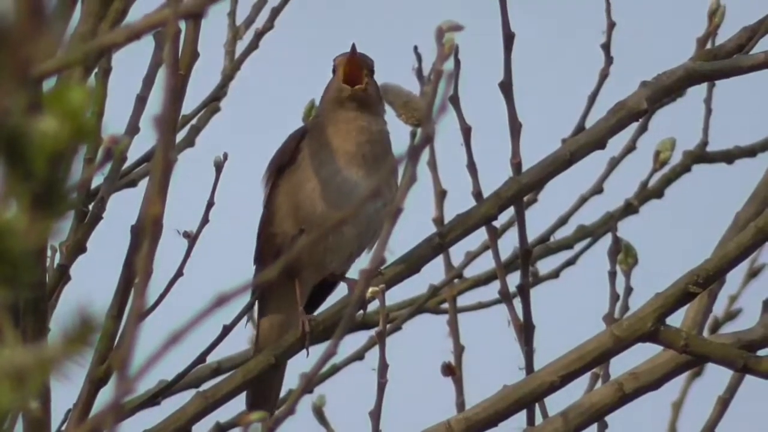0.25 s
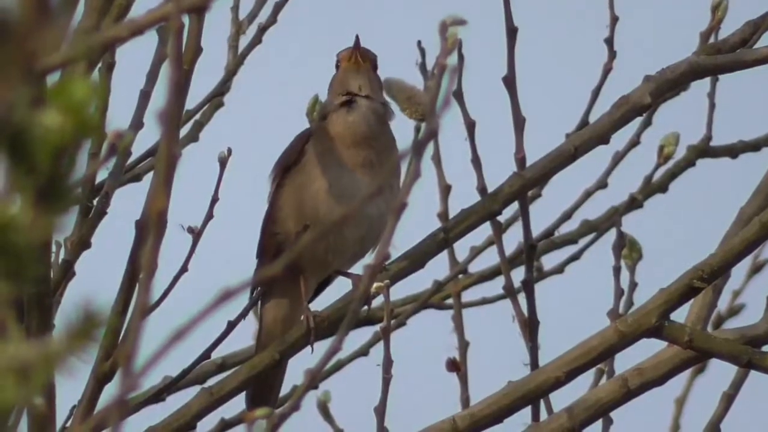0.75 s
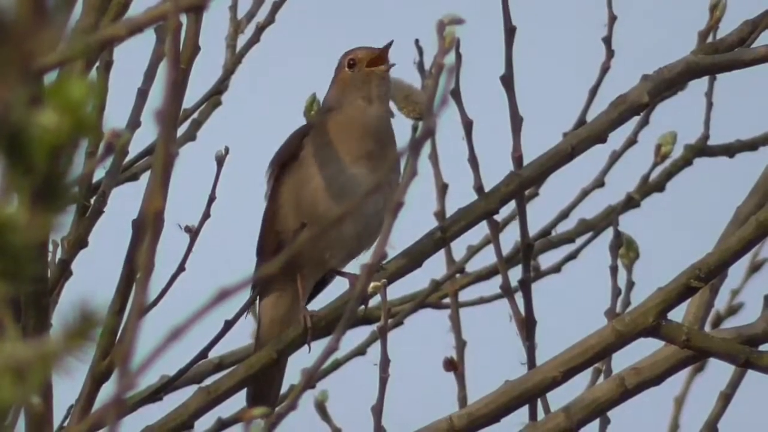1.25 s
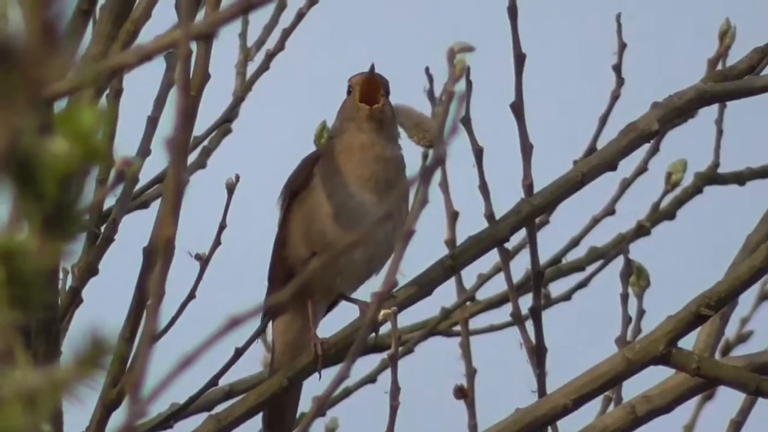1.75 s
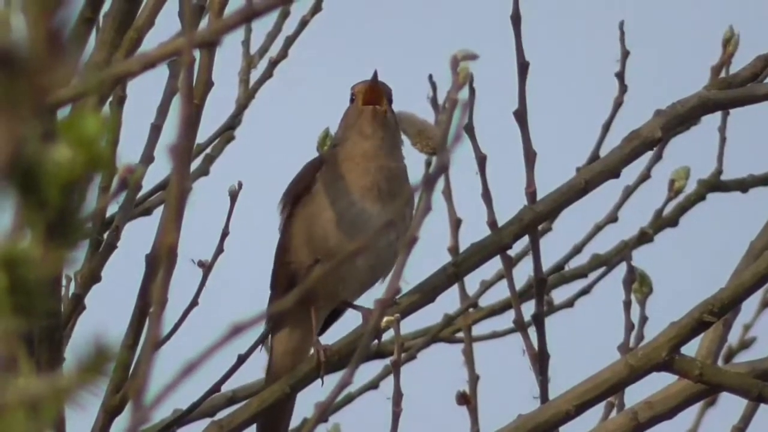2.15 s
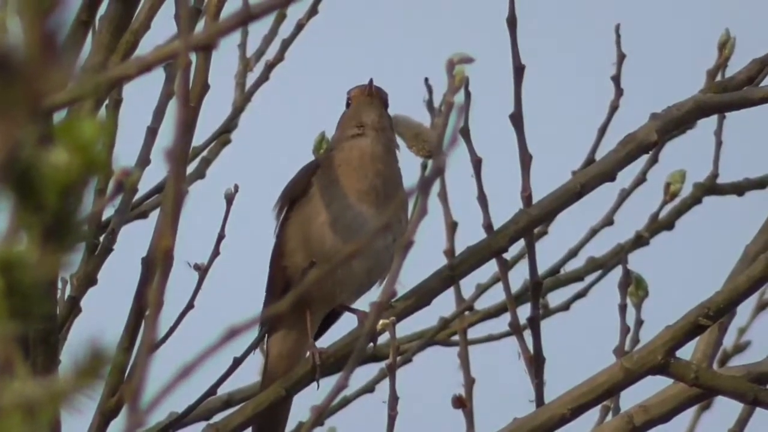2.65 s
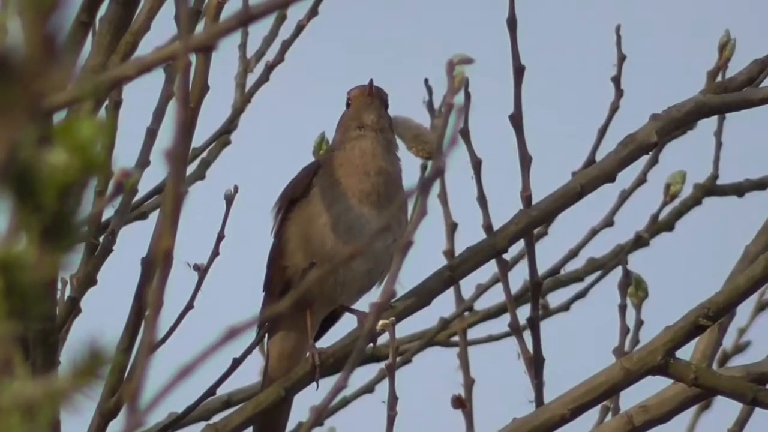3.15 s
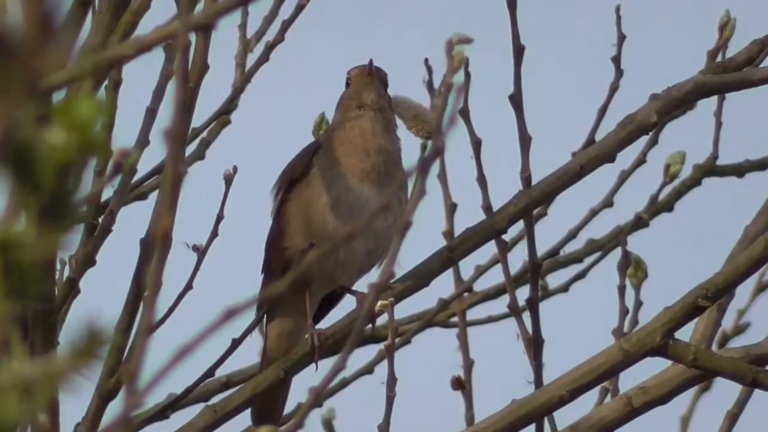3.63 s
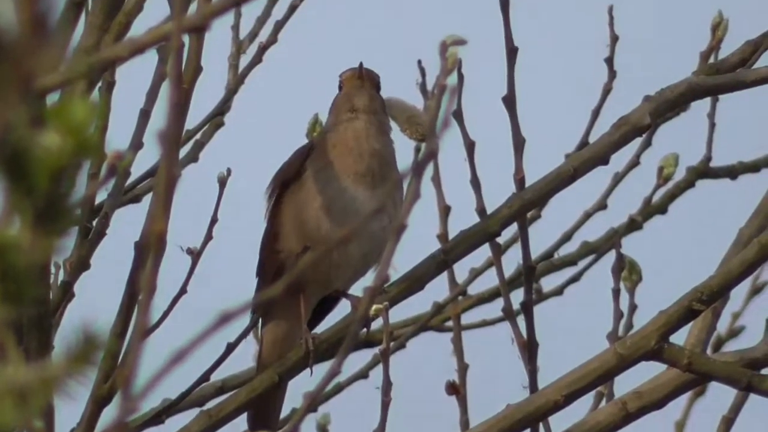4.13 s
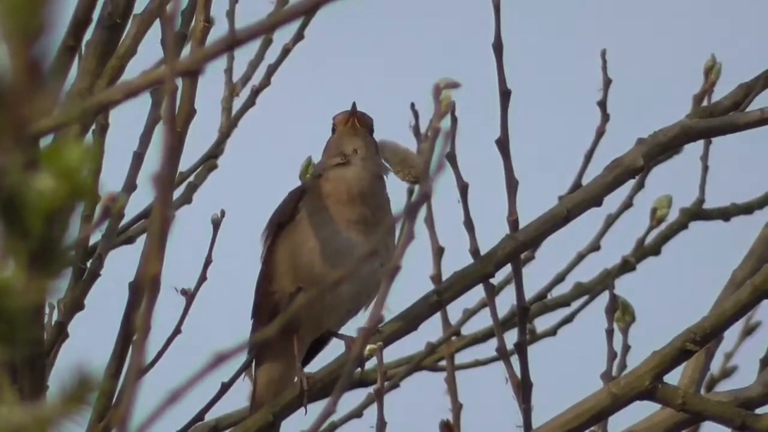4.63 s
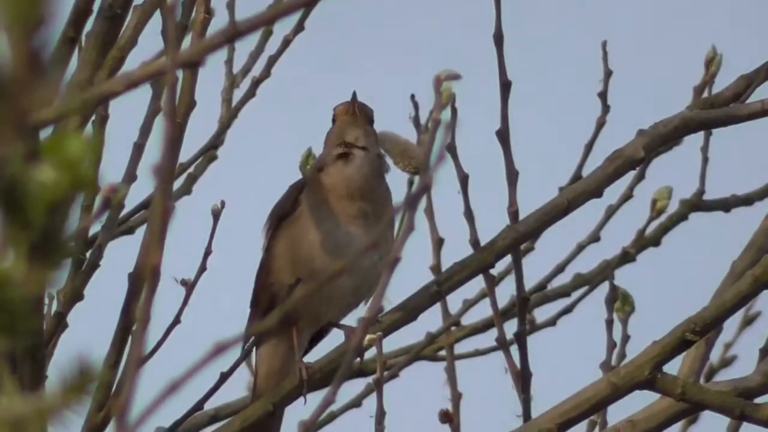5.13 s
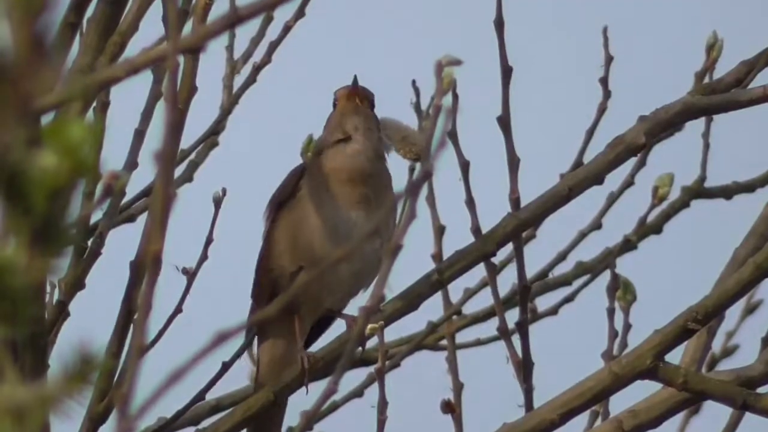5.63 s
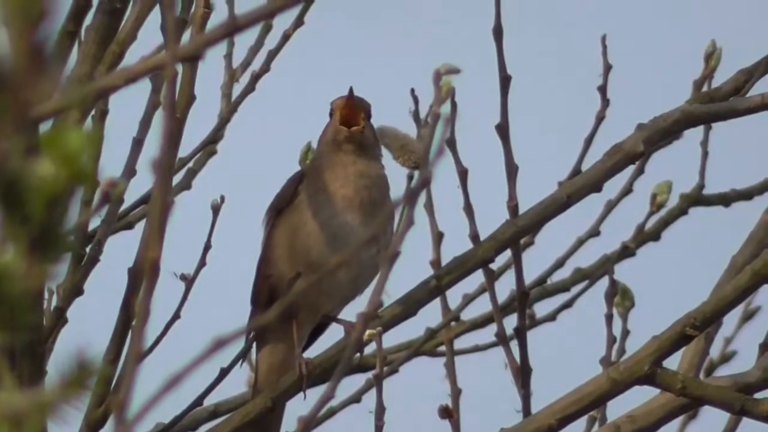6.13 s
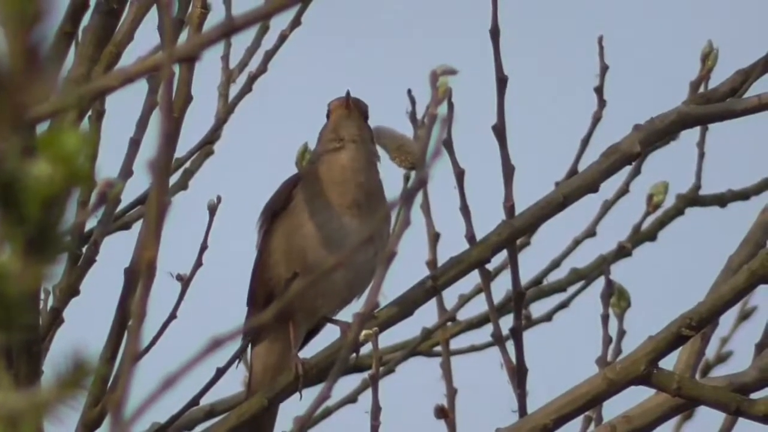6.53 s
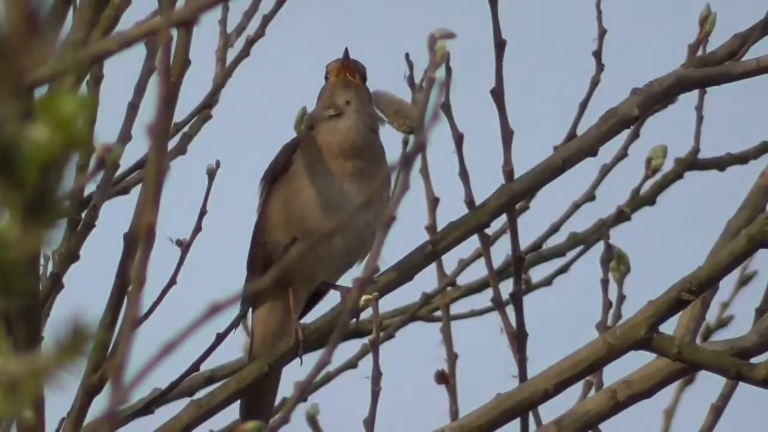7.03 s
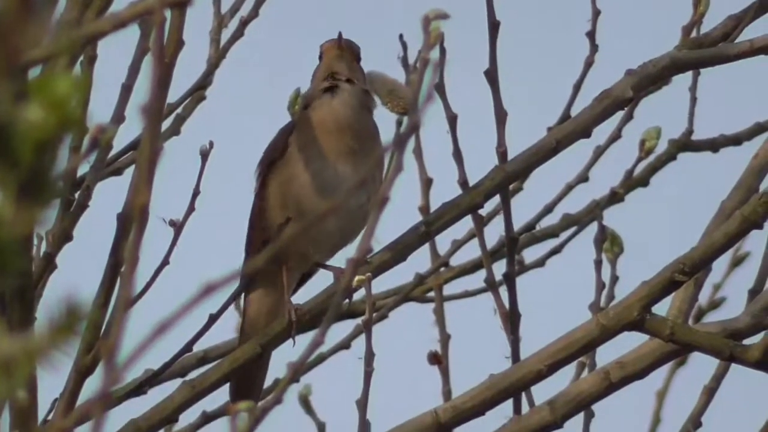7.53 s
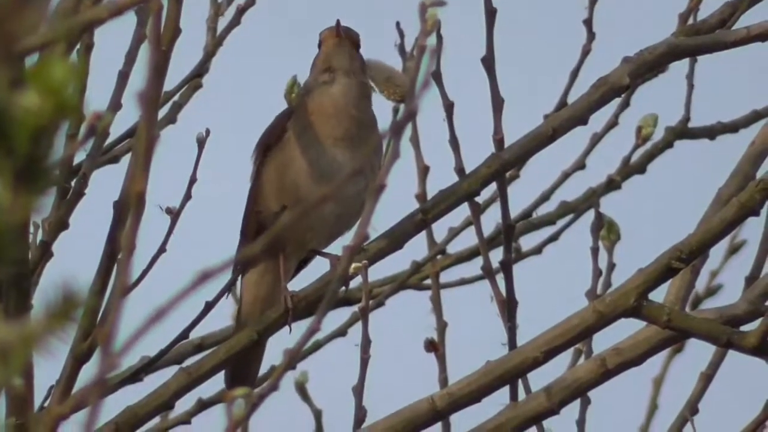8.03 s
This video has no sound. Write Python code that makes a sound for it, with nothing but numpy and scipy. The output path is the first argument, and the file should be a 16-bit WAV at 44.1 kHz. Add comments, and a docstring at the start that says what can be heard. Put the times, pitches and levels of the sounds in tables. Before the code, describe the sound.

A nightingale sings close by in varied bursts of whistles, clicks, trills and a buzz, with fainter birds and a high steady reel behind.

```python
"""A nightingale sings close by: whistles, sweeps, a trill, a rattle of clicks and a buzz.
Its whistles are near-pure tones with beak-coloured overtones; clicks are very fast pitch drops with a rasp.
Other birds answer from the thicket with fainter whistles, one with a steady reel of pulses near 4 kHz.
Shaped noise makes the low wash of a distant road, and the trees throw every note back as a fading tail."""
import sys
import numpy as np
from scipy import signal
from scipy.fft import rfft, irfft
from scipy.io import wavfile
from scipy.ndimage import uniform_filter1d

SR = 44100
rng = np.random.default_rng(int(sys.argv[2]) if len(sys.argv) > 2 else 0)


def wav_record(signal):
    """Record a signal, one row per channel, as 16-bit PCM in the file named by sys.argv[1]."""
    frames = np.transpose(np.atleast_2d(signal))
    bounded = np.clip(frames, -1, 1)
    # unit amplitude maps onto the largest positive 16-bit level
    quanta = np.round(bounded * 32767).astype(np.int16)
    wavfile.write(sys.argv[1], SR, quanta)


N = 364707  # length of the scene in samples

# Single notes. Each entry: beak opening as dB on the high overtones, then rows of
# time in seconds, pitch in Hz, level in dB.
NOTES = [(-5, [(1.075, 3040, -40), (1.078, 3140, -31.5), (1.088, 2275, -23.5), (1.096, 1770, -34.5),
         (1.104, 1356, -34.5), (1.122, 1230, -41.5)]), (20, [(2.691, 5700, -41), (2.695, 4460, -29.5),
         (2.71, 1160, -51)]), (13.5, [(6.42, 6830, -43), (6.425, 3800, -24.5), (6.432, 3077, -35),
         (6.441, 3615, -25), (6.455, 3930, -23.5), (6.499, 4103, -24), (6.51, 4000, -29)]),
         (-22, [(6.797, 1430, -58), (6.806, 1174, -42), (6.87, 1125, -44.5), (6.885, 1170, -73)])]

# Syllables sung over and over. Each event row: start in seconds, level in dB.
# Each shape row: seconds after the start, pitch in Hz, dB added to the event's level.
# Long falling sweeps.
SWEEPS = [(1.386, -23.5), (1.696, -24)]
SWEEP_SHAPE = [(0.0, 3000, -7), (0.004, 2914, -0.5), (0.026, 1544, -11), (0.029, 1340, -11),
               (0.054, 1221, -19.5)]
# Short drops before the rising whistles.
DROPS = [(6.93, -28.5), (7.127, -28.5), (7.417, -27), (7.721, -27.5), (8.009, -29)]
DROP_SHAPE = [(0, 3070, -23), (0.003, 2176, 0), (0.013, 1550, -11), (0.019, 1240, -10)]
# Low tucks between the rising whistles.
TUCKS = [(7.228, -46), (7.305, -43.5), (7.5276, -43), (7.6054, -43.5), (7.8265, -45), (7.9036, -41.5)]
TUCK_SHAPE = [(-.003, 1650, -4), (.001, 1267, 2.5), (0.008, 1000, -1)]
# Fairly level low whistles after the sweeps.
HOOTS = [(1.157, -42), (1.23, -43.5), (1.472, -44.5), (1.558, -43.5)]
HOOT_SHAPE = [(0, 1057, -6), (0.01, 1111, 1.5), (.038, 1190, 4), (.05, 1140, -41)]
# One syllable of the trill (its times are worked out in trill_events).
TRILL_SHAPE = [(-.003, 2110, -24), (.002, 2009, 2.5), (.005, 1953, -1.5), (0.01, 1885, -4.5),
               (0.017, 1750, -26)]
# A low dipping whistle from the right.
DIPS = [(3.519, -58), (3.969, -57.5), (4.463, -54), (4.983, -56)]
DIP_SHAPE = [(0, 2054, -2), (.008, 1397, 3.5), (0.022, 1245, -8), (0.047, 1992, 8), (.08, 1940, 3),
             (0.119, 1640, -1)]
# Thin rising calls of a far bird.
RISES = [(7.385, -61.5), (7.578, -62.5), (7.755, -59), (7.884, -59), (8.029, -52.5), (8.164, -50)]
RISE_SHAPE = [(-.004, 5650, -10), (.01, 7620, -5.5), (0.026, 8300, -4)]
# Faint falling chirps from deep in the thicket.
FALLS = [(4.54, -57), (4.8, -56), (4.905, -57.5), (5.025, -60)]
FALL_SHAPE = [(0, 4000, -1), (.02, 3460, -4.5), (.055, 2950, -17)]

# Stretched syllables. Each event row: start in seconds, length in seconds, low pitch in Hz,
# high pitch in Hz, level in dB.
# Each shape row: share of the length, height from low (0) to high (1), dB added to the event's level.
# Rising whistles after the drops.
LIFTS = [(7.156, 0.044, 1213, 2547, -27.5), (7.446, 0.046, 1140, 2560, -27.5),
         (7.751, 0.047, 1186, 2638, -27), (8.039, 0.05, 1080, 2910, -27)]
LIFT_SHAPE = [(0, 0, -19.5), (0.251, .35, -21.5), (.45, 0.73, -1.5), (.65, 0.98, -1), (.88, 1, -1.5),
              (1, 1, -10.5)]
# Paired scoops that sag, then flick up.
SCOOPS = [(3.93, 0.052, 3794, 4560, -30.5), (4.0, 0.048, 3733, 4360, -29.5), (4.315, .047, 3780, 4350, -25),
          (4.383, 0.047, 3605, 4190, -24.5)]
SCOOP_SHAPE = [(0, 0.45, -23), (.3, 0.008, -9), (.6, 0.19, 1), (.87, 1, -1.5), (1, 0.94, -22)]
# Low loops: a quick dip, a climb and a long sag.
LOOPS = [(5.181, 0.13, 1282, 1834, -37), (5.729, 0.12, 1140, 1836, -36.5)]
LOOP_SHAPE = [(0, 0.91, -64), (0.017, .85, -0.5), (0.069, 0.095, -4.5), (.15, 0.0098, -3),
              (0.289, 0.88, -2.5), (.4, 1, 2.5), (.92, .5, -4), (1, 0.53, -39)]
# Bright lead-ins to the later two seeps.
LEAD_INS = [(.316, 0.034, 6000, 7240, -37.5), (4.876, 0.027, 6330, 7050, -41)]
LEAD_IN_SHAPE = [(0, 0, -23), (.22, 0.92, -.5), (.55, 0.95, -19), (1, 1, -13)]
# Thin high seeps from the left.
SEEPS = [(0, 0.036, 7190, 7630, -37), (.343, 0.032, 7500, 7550, -23.5), (4.9, 0.034, 7510, 7950, -26.5)]
SEEP_SHAPE = [(0, 0.93, -3), (.2, 0.67, -10.5), (.5, 0.03, -7), (1, 0.13, -24.5)]

# Overtones against the first partial. Each row: the overtone's own frequency in Hz, level in dB.
OVERTONES = [(2000, -27), (3500, -22.5), (5200, -29.5), (6500, -29), (8000, -39.5), (10200, -18.5),
             (12500, -25.5), (13800, -27), (15600, -54)]
# Air whistling past the beak during the trill. Each row: time in seconds, pitch in Hz, level in dB.
TRILL_HISS = [(.59, 12700, -65), (.93, 12600, -69.5)]
# Single clicks near 4 kHz. Each row: start in seconds, level in dB.
CLICKS = [(1.057, -27), (1.369, -27), (1.6813, -28.5), (2.6873, -26.5), (5.5276, -36), (5.5354, -35.5)]
# Lower double ticks with the beak nearly shut. Each row: start in seconds, level in dB.
TICKS = [(0.1744, -30.5), (0.181, -39), (4.7095, -35), (4.7168, -42)]
# Click groups of the rattle. Each row: start in seconds, length in seconds, level in dB.
RATTLE = [(1.834, 0.082, -32), (1.974, 0.078, -31), (2.1193, 0.078, -31), (2.2583, 0.081, -30),
          (2.4, .0806, -30), (2.5424, 0.082, -31)]
# The four clicks of a group. Each row: share of the group's length, dB added to its level.
RATTLE_GROUP = [(0, -0.35), (.252, 0.87), (0.729, -1.2), (1, -0.72)]
# Colour of the air rasping in a click. Each row: frequency in Hz, relative level in dB.
RASP = [(1500, -27), (2500, -47), (4300, 3), (7000, -11), (10300, -1.5), (13500, -7), (15800, -71)]
# The buzz. Each row: time in seconds, level in dB, pitch in Hz, second partial against the first in dB.
BUZZ = [(6.041, -48, 6440, 1), (6.308, -54.5, 5800, 3), (6.325, -58, 6160, -3)]
# Colour of the air in the buzz. Each row: frequency in Hz, relative level in dB.
BUZZ_HISS = [(4800, -40), (5800, 1), (7600, -5), (10300, 4), (12300, -14), (13700, 1), (14600, -26)]
# Level difference of the near bird at the two microphone ports. Each row: frequency in Hz, left minus right in dB.
PORT_LEAN = [(1150, 1.3), (1900, 2), (3000, -.7), (4000, -1.3), (6200, 2.2), (12000, .3)]
# Phase difference there. Each row: frequency in Hz, lead of the left in radians.
PORT_PHASE = [(1150, -.1), (1900, -.22), (2900, -.18), (4000, .11), (6200, .72), (9000, -.5), (12000, 0)]

# Gliding calls of other birds. Each row: start in seconds, length in seconds, first pitch in Hz,
# last pitch in Hz, share of the length spent gliding, level in dB, left minus right in dB.
GLIDES = [(0.03, 0.038, 2900, 1440, 0.68, -68, 4), (0.032, 0.03, 8900, 8450, 0.68, -62.5, 6),
          (0.14, 0.036, 7460, 7680, 0.59, -61.5, 21), (0.355, 0.023, 7750, 7930, 0.54, -43.5, 9),
          (0.425, 0.045, 8000, 7500, 0.44, -57, 13), (0.355, 0.047, 3000, 1450, 0.69, -67, 1),
          (2.065, .11, 3210, 2930, 0.46, -59, 13), (2.63, 0.068, 3155, 3203, 0.74, -52.5, 13),
          (2.736, 0.078, 2480, 2355, 1, -69.5, 14), (2.885, 0.083, 4160, 3146, 0.16, -56, 12),
          (2.985, 0.1, 5100, 4860, 0.5, -64, -2), (3.108, 0.02, 9900, 10040, 0.66, -59, 3),
          (3.234, 0.022, 5150, 5000, 0.59, -50.5, 5), (3.317, 0.023, 3160, 5150, 0.33, -66.5, -6),
          (3.638, 0.083, 4540, 4390, 0.56, -70.5, -5), (3.784, 0.025, 4460, 5300, 0.92, -65, -3),
          (3.886, 0.035, 3620, 4180, 0.91, -61.5, -3), (4.203, 0.062, 3340, 4750, 0.99, -63, 0),
          (5.152, 0.047, 5650, 5200, 0.9, -76, 5), (5.165, .02, 3500, 3550, .5, -60, -3),
          (8.13, 0.14, 586, 553, 0.5, -56.5, -7)]
# Warbles of other birds. Each entry: left minus right in dB, flutters per second, time of a pitch crest
# in seconds, then rows of time in seconds, pitch in Hz, level in dB, flutter depth in Hz.
WARBLES = [(9.5, 46, 1.4, [(1.445, 3920, -57, 512), (1.5, 3870, -57.5, 498), (1.538, 4800, -58, 0),
           (1.572, 3140, -54, 0), (1.612, 3290, -58, 0)]), (9.0, 82.5, 5.5, [(3.0, 3525, -54, 0),
           (3.042, 3625, -43.5, 0), (3.058, 3386, -51.5, 551), (3.095, 2600, -61, 198),
           (3.107, 2780, -54, 0), (3.16, 2630, -70, 0)]), (-2.0, 0, 0, [(3.149, 5250, -68, 0),
           (3.175, 4550, -66, 0), (3.2, 4500, -62, 0.0046), (3.21, 3900, -72, 0), (3.22, 4520, -57, 0),
           (3.25, 4500, -57, 0)])]
# Soft hoarse calls far off. Each row: start in seconds, length in seconds, pitch in Hz, level in dB.
WHEEZES = [(5.333, 0.19, 5540, -73), (5.557, 0.1, 5450, -72), (5.76, 0.063, 5200, -75)]
# Loudness of the reel. Each row: time in seconds, level in dB.
REEL = [(4.3, -65), (5.1, -58), (5.5, -56.5), (6.7, -57), (8.27, -57)]
# The three pulses of a reel turn. Each row: place in the turn (0 to 1), pitch in Hz,
# relative level in dB, length in seconds.
REEL_PULSES = [(0, 4116, 0.5, 0.0039), (0.562, 3680, -10, 0.0026), (0.631, 4500, -3.5, .0022)]
# Pace of the reel. Each row: time in seconds, turns per second.
REEL_PACE = [(4.5, 52.7), (5.9, 51.6), (6.7, 50.8), (8.27, 50.5)]

# Colour of the road's wash. Each row: frequency in Hz, relative level in dB.
WASH = [(28, -47), (42, -6), (65, -1.5), (124, -15), (260, -0.5), (370, -5.5), (520, -5), (942, -12),
        (1680, -28.5), (4460, -33), (6330, -38), (11300, -32.5), (14500, -40), (16000, -47)]
# Likeness of the wash on the two sides. Each row: frequency in Hz, likeness (1 is identical).
SAME = [(60, 0.9), (500, 0.7), (2000, 0.038), (10000, 0.058)]
# Sideways lean of the wash. Each row: frequency in Hz, left minus right in dB.
LEAN = [(60, 4), (250, 4), (600, 0)]
# Echoes from the trees. Each row: frequency in Hz, time to fade by 60 dB in seconds.
TREES = [(1000, 0.53), (2500, 0.93), (4000, 0.88), (8000, 1), (14000, 0.15)]

EDGE_HZ = 15900  # upper limit of the sound
BREATHY = .08  # share of turbulent flutter gained by each higher overtone
TRILL_S, TRILL_GAP_S, TRILL_COUNT = .5878, .02802, 13  # first syllable, spacing, number
TRILL_DB, TRILL_TIRE_DB, TRILL_SPREAD_DB = -34.5, -11.0, .8  # level, change at the end, random spread
BUZZ_PER_S = 190  # pulses per second
GLIDE_START_DB, GLIDE_END_DB = 1, -0.5  # added at the ends of a glide
FLICKER_DB = 2.5  # moving air breaks up the far calls
REEL_BEAT_S = 5.916  # time of one strong pulse
DIP_LAG, REEL_LAG = 4, 1  # samples by which the left port hears these late
WASH_DB = -50.5


def nightingale():
    """All parts of the near bird's song, as heard by the two microphone ports."""
    out = np.zeros((2, N))
    for beak_db, rows in NOTES:
        add(out, *whistle(rows, beak_db), 0)
    for s, db in CLICKS:
        add(out, *click(s, db, hz=4858, rasp_db=-2.5, fall_per_s=108.6, unsteady=0.053), 0)
    for s, length, db in RATTLE:
        for share, step_db in RATTLE_GROUP:
            sound = click(s + share * length, db + step_db, hz=4408, rasp_db=-1.5, fall_per_s=58.6, unsteady=0.079)
            add(out, *sound, 0)
    for s, db in TICKS:
        add(out, *click(s, db, hz=3070, rasp_db=-19.0, fall_per_s=74, unsteady=0.041), 0)
    add(out, *buzz(), 0)
    add(out, *whistle(TRILL_HISS, -40, waver=.05), 0)
    out += repeats(trill_events(), TRILL_SHAPE, beak_db=-10, warm_up=0.065)
    out += repeats(SWEEPS, SWEEP_SHAPE, beak_db=0.5)
    out += repeats(DROPS, DROP_SHAPE, beak_db=-6.0)
    out += repeats(HOOTS, HOOT_SHAPE, beak_db=-57)
    out += repeats(TUCKS, TUCK_SHAPE, beak_db=-10)
    out += syllables(LIFTS, LIFT_SHAPE, beak_db=-2.5)
    out += syllables(SCOOPS, SCOOP_SHAPE, beak_db=11.0)
    out += syllables(LOOPS, LOOP_SHAPE, beak_db=-4.5)
    out += syllables(LEAD_INS, LEAD_IN_SHAPE, beak_db=27, pan_db=3.0)
    out += syllables(SEEPS, SEEP_SHAPE, beak_db=14.0, pan_db=7.5)
    return ports(out)


def whistle(rows, beak_db, waver=0.0057, count=12):
    """A membrane in the bird's voice organ gives a near sine; the beak colours its overtones."""
    s, hz, db = np.transpose(rows)
    t = np.arange(s[0], s[-1], 1 / SR)
    n = len(t)
    # the pitch curve is rounded over 1 / count of its length, then made slightly unsteady
    hz = uniform_filter1d(np.interp(t, s, hz), size=max(n // count, 40), mode="nearest")
    hz = hz * (1 + waver * smooth_noise(n, 60))
    turn = 2 * np.pi * (np.cumsum(hz) / SR + rng.random())
    tone = np.sin(turn)
    level_db = np.interp(t, s, db)
    effort_db = 0.36 * (level_db - db.max())  # softer moments lose their high overtones first
    for k in range(2, 10):
        overtone_hz = k * hz
        opening = 1 / (1 + (6000 / overtone_hz) ** 6)  # the beak acts only above about 6 kHz
        # below 9 kHz all but the second partial stay weak
        weak_db = 8.5 * (k > 2) / (1 + (overtone_hz / 9000) ** 6)
        overtone_db = read(OVERTONES, overtone_hz) - weak_db + (beak_db + effort_db) * opening
        gusts = smooth_noise(n, 40, passes=2)
        flutter = 1 - min(BREATHY * (k - 1), 1) * opening * (1 - gusts)
        tone += gain_of(overtone_db) * (overtone_hz < EDGE_HZ) * np.sin(k * turn) * flutter
    edges = signal.windows.tukey(n, min(170 / n, 1))
    return s[0], np.sqrt(2) * gain_of(level_db) * tone * edges


def repeats(events, shape, beak_db, pan_db=0, warm_up=0., waver=0.0061):
    """One syllable sung at each event, its pitch a little different each time; the first may start flat."""
    out = np.zeros((2, N))
    for k, (s, db) in enumerate(events):
        pitch_factor = 1 + 0.0013 * rng.standard_normal() - warm_up / 2 ** k
        rows = np.array(shape) * [1, pitch_factor, 1] + [s, 0, db]
        add(out, *whistle(rows, beak_db, waver), pan_db)
    return out


def syllables(events, shape, beak_db, pan_db=0):
    """One shape stretched to the length and pitch range of each event."""
    out = np.zeros((2, N))
    for s, length, low_hz, high_hz, db in events:
        rows = np.array(shape) * [length, high_hz - low_hz, 1] + [s, low_hz, db]
        add(out, *whistle(rows, beak_db), pan_db)
    return out


def trill_events():
    """Evenly spaced trill syllables, with random level differences and a drop towards the end."""
    k = np.arange(TRILL_COUNT)
    tire_db = TRILL_TIRE_DB * (k / k[-1]) ** 12.0
    db = TRILL_DB + tire_db + TRILL_SPREAD_DB * rng.standard_normal(TRILL_COUNT)
    return np.transpose([TRILL_S + TRILL_GAP_S * k, db])


def click(s, db, hz, rasp_db, fall_per_s, unsteady):
    """The pitch falls in a few ms while air rasps through the beak and hisses on softly."""
    t = np.arange(-.003, .04, 1 / SR)
    pitch_shake, level_shake = unsteady * smooth_noise((2, len(t)), 16)
    fall = 1.04 - fall_per_s * t.clip(-.003, .005)  # as a factor on the pitch
    hz = hz * (1 + 0.036 * rng.standard_normal()) * (fall + pitch_shake)
    sweep = np.sin(2 * np.pi * np.cumsum(hz) / SR) * (1 + 5.7 * level_shake)
    swell = np.exp(-((t - .0012) / np.where(t < .0012, .0012, .0032)) ** 2)
    soft_hiss = gain_of(-20) * (t > 0) * np.exp(-t / 0.054)
    rasp_swell = np.exp(-((t - .003) / 0.0026) ** 4) + soft_hiss
    rasp = gain_of(rasp_db) * coloured(len(t), RASP) * rasp_swell
    return s + t[0], gain_of(db) * (sweep * swell + rasp)


def buzz():
    """A high tone chopped by a slower oscillation that also wobbles its pitch; air hisses between pulses."""
    s, *columns = np.transpose(BUZZ)
    t = np.arange(s[0], s[-1], 1 / SR)
    n = len(t)
    db, hz, second_db = (np.interp(t, s, c) for c in columns)
    chop = 2 * np.pi * BUZZ_PER_S * (t - 6.1031)  # a pulse peaks at 6.1031 s
    gate = evened((0.13 + .5 + .5 * np.cos(chop)) ** 0.79)
    wobble = .022 * np.sin(chop) + .018 * smooth_noise(n, 40)
    turn = 2 * np.pi * np.cumsum(hz * (1 + wobble)) / SR
    tone = np.sqrt(2) * gate * (np.sin(turn) + gain_of(second_db) * np.sin(2 * turn))
    tone = tone * gain_of(2.0 * smooth_noise(n, 150))  # uneven loudness
    hiss = gain_of(-7) * coloured(n, BUZZ_HISS) * (1 - 0.54 * np.cos(chop))
    return s[0], gain_of(db) * (tone + hiss) * signal.windows.tukey(n, .04)


def ports(x):
    """Level and phase differences between the two microphone ports."""
    hz = np.fft.rfftfreq(N, 1 / SR)
    half = np.array([[.5], [-.5]])  # half the difference to each side
    level = gain_of(half * read(PORT_LEAN, hz))
    phase = np.exp(1j * half * read(PORT_PHASE, hz))
    return irfft(rfft(x) * level * phase, N)


def other_birds():
    """Farther singers: whistles with much weaker high overtones, except for the warbles."""
    out = np.zeros((2, N))
    for s, length, from_hz, to_hz, share, db, pan_db in GLIDES:
        turn_s = s + length * np.clip(share, .1, .95)  # the glide ends here and the pitch holds
        rows = [(s, from_hz, db + GLIDE_START_DB), (turn_s, to_hz, db), (s + length, to_hz, db + GLIDE_END_DB)]
        add(out, *whistle(rows, -20, waver=0.0092), pan_db)
    for pan_db, *row in WARBLES:
        add(out, *warble(*row), pan_db)
    for s, length, hz, db in WHEEZES:
        add(out, *whistle([(s, hz, db), (s + length, hz, db)], -40, waver=0.046), 0)
    return out + repeats(RISES, RISE_SHAPE, beak_db=-29, pan_db=11.0)


def warble(per_s, crest_s, rows):
    """A whistle whose pitch flutters about its course."""
    s, *columns = np.transpose(rows)
    t = np.arange(s[0], s[-1], 1 / 2000)
    hz, db, depth = (np.interp(t, s, c) for c in columns)
    fluttering_hz = hz + depth * np.cos(2 * np.pi * per_s * (t - crest_s))
    return whistle(np.transpose([t, fluttering_hz, db]), -1, count=400)


def dipper():
    """The low singer on the right, reaching the left port late."""
    return lagged(repeats(DIPS, DIP_SHAPE, beak_db=-25, pan_db=-2.5), count=DIP_LAG)


def reel():
    """A far warbler repeats a group of three short pulses some fifty times a second, gradually slower."""
    t = np.arange(N) / SR
    pace = np.interp(t, *np.transpose(REEL_PACE))
    turns = np.cumsum(pace) / SR
    turns = turns - turns[round(REEL_BEAT_S * SR)]
    out = np.zeros(N)
    for place, hz, db, length in REEL_PULSES:
        whole = np.floor(turns - place + .5).astype(int)  # number of the nearest pulse
        # each pulse differs a little in pitch, level and timing
        pitch_chance, level_chance, time_chance = rng.standard_normal((3, 600))[:, whole % 600]
        since = (turns - place - whole + .015 * time_chance) / pace  # seconds from the pulse's middle
        pitch = hz * (1 + 0.018 * pitch_chance)
        swell = np.exp(-(2 * since / length) ** 2)
        out += gain_of(db + 1.16 * level_chance) * swell * np.sin(2 * np.pi * pitch * since)
    level_db = np.interp(t, *np.transpose(REEL), left=-150)
    return evened(out) * gain_of(level_db) * gain_of([[-1.5], [1.5]])  # leans to the right


def far_chirps():
    """The faint falling chirps, as unsteady whistles."""
    return repeats(FALLS, FALL_SHAPE, beak_db=-25, pan_db=2.6, waver=.025)


def flicker():
    """A quick random wavering of level."""
    return gain_of(FLICKER_DB * smooth_noise(N, 200, passes=2))


def trees(x, near_db=24.5, near_s=0.031):
    """Scattered echoes of random sign, each band dying at its own speed; nearest branches add early strength."""
    taps = np.zeros((2, SR))
    # one echo at a random place in every 24 samples
    at = np.arange(200, SR - 24, 24) + rng.integers(0, 24, (2, (SR - 201) // 24))
    np.put_along_axis(taps, at, rng.standard_normal(at.shape), 1)
    hz, t, z = signal.stft(taps, SR, nperseg=256)
    fade_db = -60 * t / np.maximum(read(TREES, hz), .05)[:, None] + near_db * np.exp(-t / near_s)
    z = z + z[::-1] / (1 + (hz[:, None] / 3500) ** 2)  # long waves reach both microphones alike
    tail = signal.istft(z * gain_of(fade_db), SR, nperseg=256)[1]
    tail = tail / np.linalg.norm(tail, axis=1, keepdims=True)
    return signal.fftconvolve(x, tail, axes=1)[:, :N]


def wash():
    """The distant road: noise built from random short-time spectra with faint patches of level."""
    frames, hz = N // 256 + 5, np.fft.rfftfreq(1024, 1 / SR)
    a, b, c, d, patches = rng.standard_normal((frames, 513, 5)).T
    patches = uniform_filter1d(patches, size=6, axis=0)  # smooth across frequency
    patches = evened(uniform_filter1d(patches, size=30, axis=1))  # and across time
    same = np.clip(read(SAME, hz), -1, 1)[:, None]
    left, other = a + 1j * b, c + 1j * d
    z = np.array([left, same * left + np.sqrt(1 - same ** 2) * other])
    z *= gain_of(read(WASH, hz)[:, None] + 1.0 * patches)
    z *= gain_of(np.outer([.5, -.5], read(LEAN, hz)))[:, :, None]
    return gain_of(WASH_DB) * evened(signal.istft(z, nperseg=1024, noverlap=768)[1][:, :N])


def gain_of(db):
    """Turns decibels into a factor."""
    return 10 ** (np.asarray(db) / 20)


def evened(x):
    """Scales to an rms (average strength) of 1."""
    return x / np.sqrt(np.mean(x ** 2) + 1e-20)


def smooth_noise(shape, size, passes=1):
    """Random wandering of rms 1, smoothed over a number of samples."""
    noise = rng.standard_normal(shape)
    for _ in range(passes):
        noise = uniform_filter1d(noise, size=size)
    return evened(noise)


def read(points, hz):
    """Reads a table of frequency and value, with frequency on a log axis."""
    f, value = np.transpose(points)
    return np.interp(np.log(hz + 1), np.log(f + 1), value)


def coloured(n, points):
    """Noise of rms 1 with a given spectrum."""
    spectrum = rfft(rng.standard_normal(n))
    return evened(irfft(spectrum * gain_of(read(points, np.fft.rfftfreq(n, 1 / SR))), n))


def add(mix, s, sound, pan_db):
    """Places a sound between the two microphones; positive pan_db leans left."""
    part = mix[:, max(round(s * SR), 0):][:, :len(sound)]
    part += gain_of([[pan_db / 2], [-pan_db / 2]]) * sound[:part.shape[1]]


def lagged(x, count):
    """Delays the left channel by a number of samples."""
    return np.array([np.roll(x[0], count), x[1]])


def scene():
    """Adds all sources; the farther the singer, the larger the share of echoes."""
    near = nightingale()
    far = flicker() * (other_birds() + far_chirps()) + dipper()
    reeling = lagged(reel(), count=REEL_LAG)
    echoes = trees(gain_of(-11) * near + gain_of(-8) * reeling)
    echoes += trees(gain_of(-5) * far, near_db=15.5)
    return near + far + reeling + echoes + wash()


def record(dry):
    """The microphone's bass roll-off, then the upper band limit."""
    rolled = signal.sosfilt(signal.butter(3, 42, "high", fs=SR, output="sos"), dry)
    band_limit = signal.firwin(511, EDGE_HZ, window=("kaiser", 9), fs=SR)
    return signal.oaconvolve(rolled, band_limit[None], "same")


dry = scene()
out = record(dry)
wav_record(out)
```